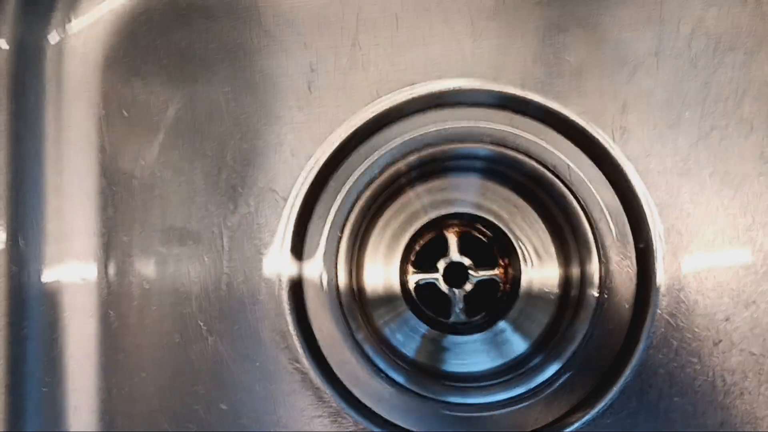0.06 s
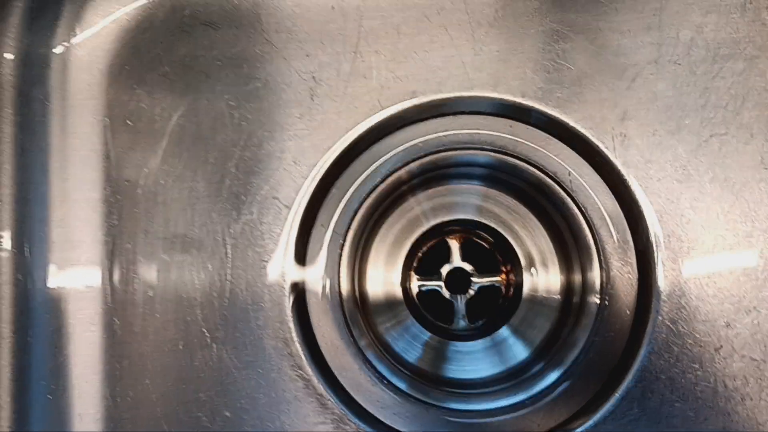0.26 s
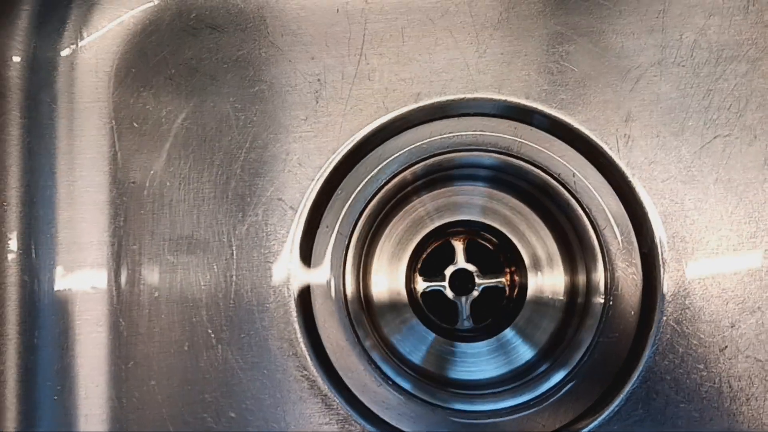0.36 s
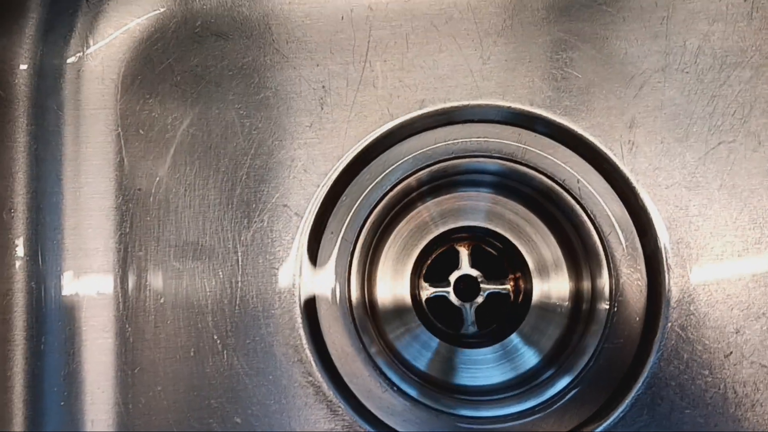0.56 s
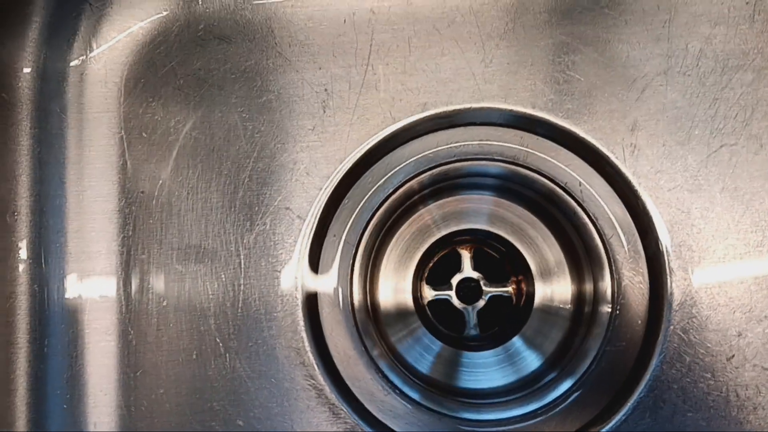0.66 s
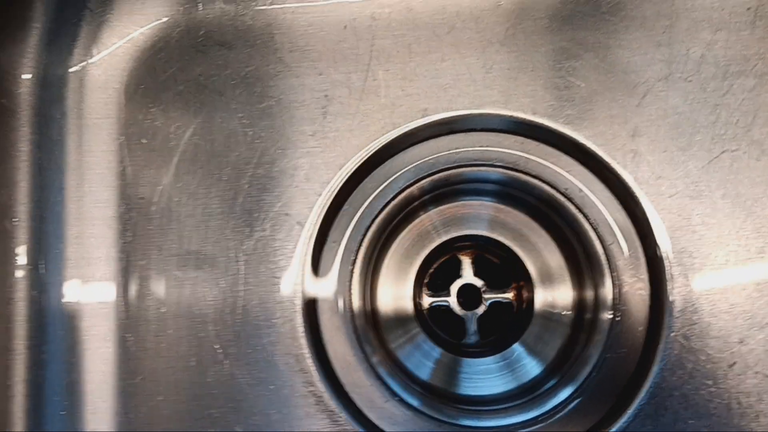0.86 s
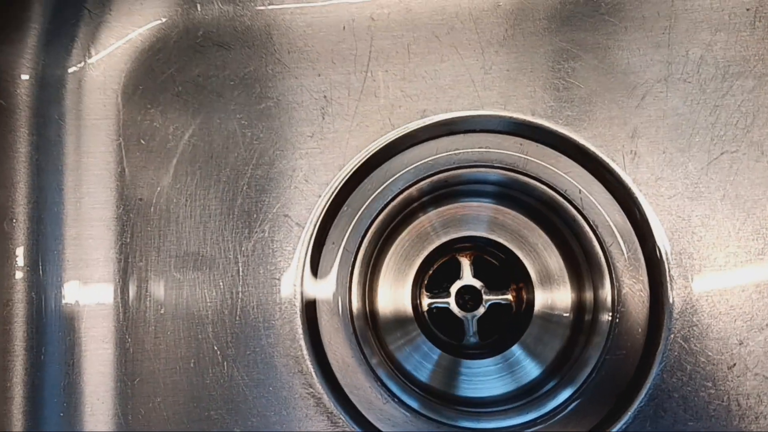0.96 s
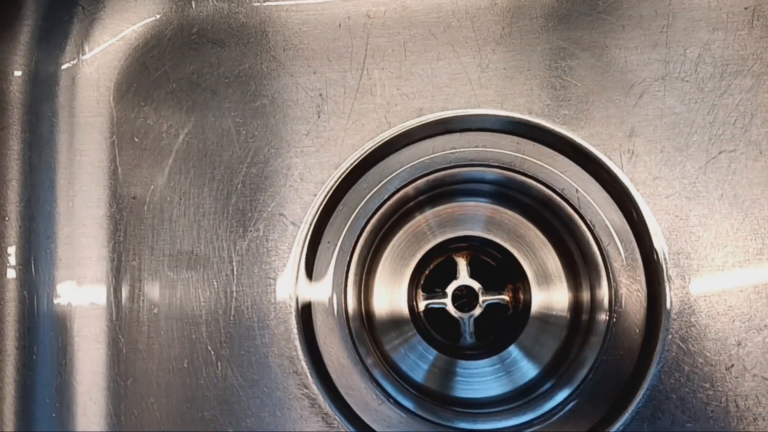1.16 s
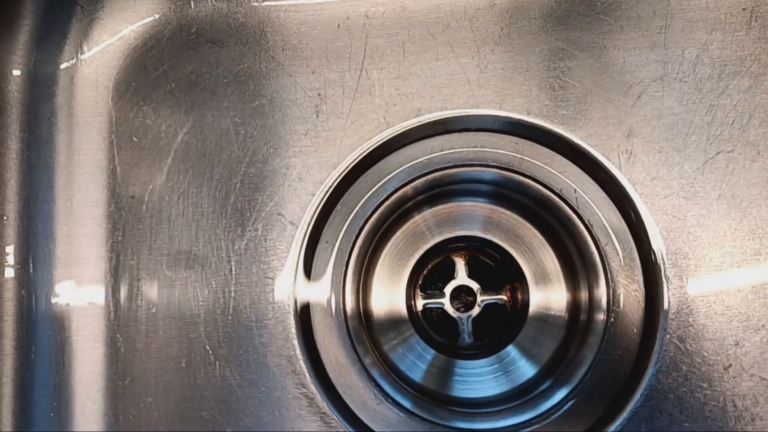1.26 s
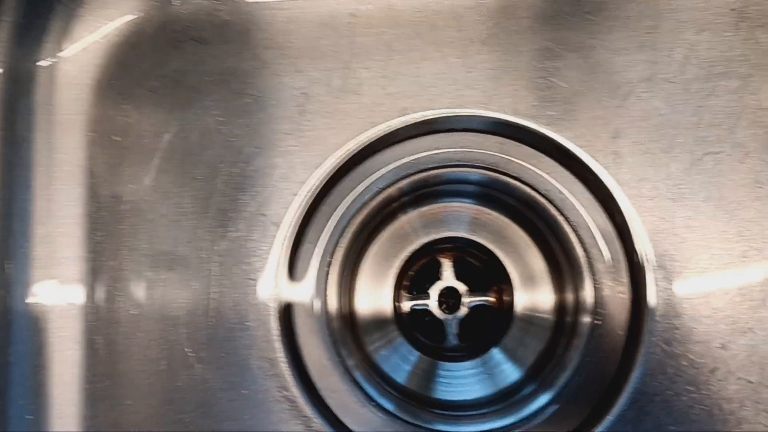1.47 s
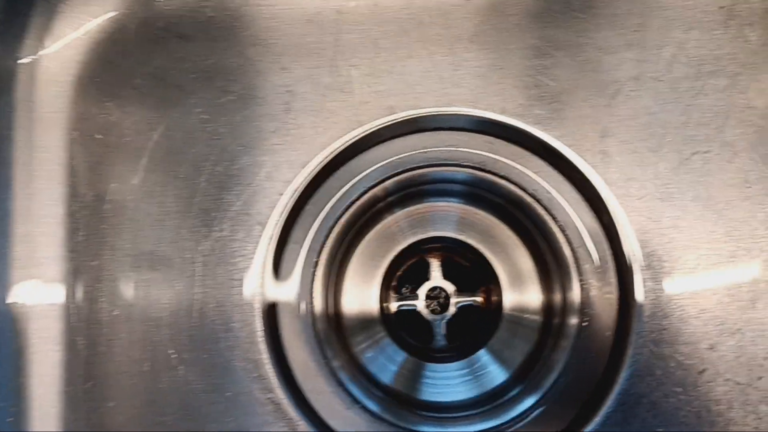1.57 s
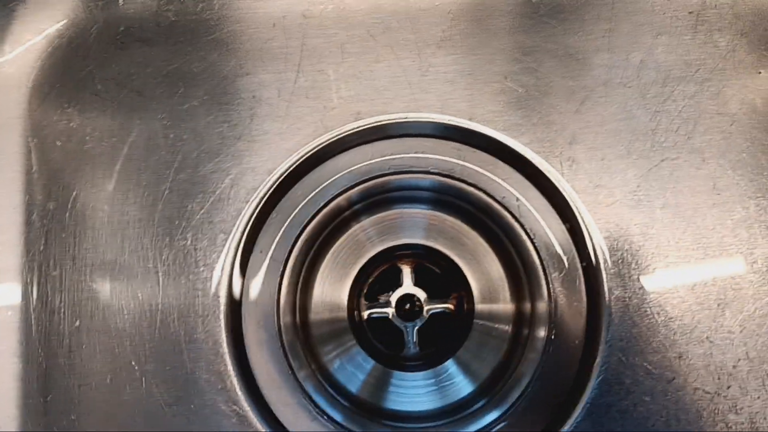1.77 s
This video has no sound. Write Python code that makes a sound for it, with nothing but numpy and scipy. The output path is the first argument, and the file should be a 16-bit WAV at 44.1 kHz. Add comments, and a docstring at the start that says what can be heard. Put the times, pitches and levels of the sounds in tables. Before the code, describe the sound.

Water gurgles down a steel sink drain, heard close up. Uneven bubbles start popping at about 0.2 seconds, ringing in the pipe with fine fizz and droplet ticks. The gurgling and sloshing are strongest from 0.6 to 1.2 seconds, with a brief hollow note around 1 second. After a smaller burst near 1.5 seconds, the bubbling fades by 1.8. A faint low hum and rumble fill the kitchen throughout.

```python
"""Water gurgles down the drain of a steel kitchen sink, heard from just above the basin.
Air bubbles break in the trap (the bend under the sink), each with a spray of smaller ones, over a fine
churn, fizz and slosh that swell and die away. The pipe rings with every bubble, droplets tick on the
steel and the air in the pipe briefly sings. A low hum and rumble fill the quiet kitchen."""
import sys
import numpy as np
from scipy import signal
from scipy.fft import rfft, irfft, next_fast_len
from scipy.io import wavfile
from scipy.ndimage import map_coordinates

SR = 44100
rng = np.random.default_rng(int(sys.argv[2]) if len(sys.argv) > 2 else 0)


def waveform_to_disk(signal):
    """Save audio, clipped to [-1, 1], as 16-bit WAV at the path in sys.argv[1]."""
    frames = np.transpose(np.atleast_2d(signal))
    scaled = np.clip(frames, -1, 1) * 32767
    samples = np.round(scaled).astype(np.int16)
    wavfile.write(sys.argv[1], SR, samples)


N = 79380
TIME = np.arange(N) / SR


def amp(db):
    """Turn decibels into a factor to multiply by."""
    return 10 ** (np.asarray(db) / 20)


def unit(x):
    """Scale a sound to an average power of 1."""
    return x / np.sqrt(np.mean(x ** 2) + 1e-20)


def along(points, hz):
    """Read a table of (frequency, value) at hz, spacing the frequencies by octaves."""
    f, value = np.transpose(points)
    return np.interp(np.log(hz + 1), np.log(f + 1), value)


def waver(steps):
    """A smooth random wobble; more steps make it faster."""
    return map_coordinates(rng.standard_normal(steps + 1), [np.linspace(0, steps, N)], mode="nearest")


def filtered(x, response):
    """Scale and delay each frequency f in a sound by response(f)."""
    size = 2 * next_fast_len(N)
    return irfft(rfft(x, size) * response(np.fft.rfftfreq(size, 1 / SR)), size)[..., :N]


def causal(db):
    """A filter response with these gains that never sounds ahead of its input (minimum phase)."""
    cepstrum = irfft(np.log(amp(db)))
    half = len(cepstrum) // 2
    cepstrum[1:half] *= 2
    cepstrum[half + 1:] = 0
    return np.exp(rfft(cepstrum))


def place(starts, waves):
    """Add up short sounds, each at its own start time."""
    at = (starts * SR).astype(int)[:, None] + np.arange(waves.shape[1])
    return np.bincount(at.ravel(), waves.ravel(), N)[:N]


def kitchen(hum_db=4, waver_db=.4, rumble_db=-42):
    """An appliance hums, wavering slightly, over a low rumble."""
    # tones of the hum: f/Hz, relative level/dB
    hum_tones = [(59.2, -45), (118.4, -51.5), (177.6, -47.5)]
    # tone colour of the rumble: f/Hz, relative level/dB
    rumble_colour = [(20, -11), (45, 0), (110, 4), (150, 1.5), (200, 2), (250, 3), (300, -36), (500, -20.5),
                     (1500, -25.5), (4500, -53.5), (9500, -63), (11500, -61)]
    hum = 0
    for hz, db in hum_tones:
        peak = np.sqrt(2) * amp(db + hum_db + waver_db * waver(14))
        hum += peak * np.sin(2 * np.pi * (hz * TIME + rng.random()))
    rumble = filtered(rng.standard_normal(N), lambda f: amp(along(rumble_colour, f)))
    return hum + amp(rumble_db) * unit(rumble)


def tail(fade_s):
    """A blur of echoes: noise in which each frequency f falls by 60 dB in fade_s(f) seconds."""
    hz, t, spectrum = signal.stft(rng.standard_normal(SR // 3), SR, nperseg=128)
    fade = amp(-60 * t / fade_s(hz)[:, None])
    echoes = signal.istft(spectrum * fade, SR, nperseg=128)[1]
    return np.pad(echoes / np.linalg.norm(echoes), (90, 0))  # arrives about 2 ms late


def scatter(x, fade_s, count=12):
    """Echoes change as the water surface moves: one random pattern blends into the next."""
    position = np.linspace(0, count - 1, N)
    shares = (np.maximum(1 - abs(position - k), 0) ** .5 for k in range(count))
    return sum(signal.fftconvolve(x * share, tail(fade_s))[:N] for share in shares)


def reflections(x, basin_fade_s=0.063, room_db=-15):
    """Sound bounces quickly between the basin walls and lingers longer in the kitchen."""
    # strength of the bounces, as steel mirrors treble best: f/Hz, gain/dB
    basin_colour = [(1500, -10), (6000, 0)]
    # time the kitchen's echo takes to fall by 60 dB: f/Hz, time/s
    room_fade = [(200, 0.33), (2000, 0.34), (10000, 0.031)]
    bounces = scatter(x, lambda f: np.full_like(f, basin_fade_s))
    basin = filtered(bounces, lambda f: amp(along(basin_colour, f)))
    room = scatter(x, lambda f: along(room_fade, f))
    return basin + amp(room_db) * room


def left_and_right(f, left_lag_s=0.0009937):
    """Sound reaches the left side later and has a different tone colour on the right."""
    # how much louder the left is than the right: f/Hz, level/dB
    balance = [(400, 5), (650, 3), (920, 8.5), (1400, 15.5), (1750, 8.5), (2200, 0.5), (3100, 5.5),
               (4900, -14.5), (6000, -12.5), (7600, -0.5), (9500, -13.5), (12000, -10)]
    half_lag = np.pi * f * left_lag_s
    return np.array([np.exp(-1j * half_lag), np.exp(1j * half_lag) * causal(-along(balance, f))])


def drain(f, steel_width_hz=42, echo_s=0.013, echo_db=-12.5):
    """Pipe and steel ring, the pipe's far end sends back an echo, and the drain mouth colours it all."""
    # notes of the pipe and basin (narrow ones ring longer): f/Hz, width/Hz, gain over direct sound/dB
    pipe_notes = [(248, 13.2, 9.5), (454.4, 6.8, 10.5), (654, 11, 7.5), (692, 10.2, 14.5),
                  (736.4, 19.2, 12.5), (910.5, 14.1, 25), (1111.6, 44, 8), (1287.4, 21.8, 10.5),
                  (1379.7, 19.3, 6), (1598, 26, 5.5), (1733, 72, 9)]
    # thin notes of the steel strainer and basin: f/Hz, gain over direct sound/dB
    steel_notes = [(2670, -19), (2850, 11.5), (3080, 15.5), (3340, 17.5), (3730, 15), (4720, 16.5),
                   (4810, 3), (5340, 17.5), (6030, 10.5), (6520, 9.5), (7520, 24), (8000, 9), (8760, 10),
                   (9450, 11.5), (9900, 6)]
    # tone colour of the drain mouth: f/Hz, gain/dB
    mouth = [(60, -19), (200, 0), (450, -2), (520, -8.5), (620, 0.5), (730, 1.5), (840, -5), (950, -11),
             (1380, 3), (1520, -4.5), (1790, -0.5), (1890, -14.5), (2000, -1.5), (2300, -1), (3100, -3.5),
             (4000, -8), (5300, -29), (8000, -19), (11500, -34.5)]
    notes = list(pipe_notes) + [(hz, steel_width_hz, db) for hz, db in steel_notes]
    ring = sum(amp(db) * 1j * f * width / (hz * hz - f * f + 1j * f * width) for hz, width, db in notes)
    echo = amp(echo_db) * np.exp(-2j * np.pi * f * echo_s)
    return (1 + ring + echo) * causal(along(mouth, f))


def air_column(hz=248, db=-26, start_s=0.898, rise_s=0.11):
    """The air above the trap sings a hollow, unsteady note while the flow is strongest."""
    age = np.maximum(TIME - start_s, 0) / rise_s
    swell = (age * np.exp(1 - age)) ** 2
    wobble = waver(30)
    return amp(db + 2 * wobble) * swell * np.sin(2 * np.pi * hz * TIME + .5 * wobble)


def pings(starts, hz, gain, ring_cycles, attack_cycles=.6, attack_s=.0004, rise_per_s=2.9):
    """Short tones that fade 20 dB per ring length and climb in pitch, as a surfacing bubble does."""
    t = np.arange(1500) / SR
    cycles = hz[:, None] * t
    onset = (1 - np.exp(-cycles / (attack_cycles + attack_s * hz[:, None]))) ** 2
    shape = onset * 10 ** (-cycles / ring_cycles[:, None])
    shape /= shape.max(1, keepdims=True)
    tone = np.sin(2 * np.pi * cycles * (1 + rise_per_s * t / 2))
    return place(starts, gain[:, None] * shape * tone)


def droplets(ring_cycles=12):
    """Droplets hit the steel with brief, high ticks."""
    # one row per droplet: t/s, f/Hz, relative level/dB
    hits = [(.252,9700,-27),(0.375,4770,-31.5),(.606,5140,-20.5),(.649,5910,-21.5),(0.687,8270,-25),(.720,6400,-16.5),(.808,10000,-36),(0.984,4420,-15.5),(1.014,5560,-20),(1.118,8450,-24),(1.1997,4620,-26),(1.2,8000,-20)]
    starts, hz, db = np.transpose(hits)
    return pings(starts, hz, amp(db), np.full(len(starts), ring_cycles))


def swarm(loudness, centre_hz, octaves, ring_cycles, spread_db, count):
    """Many bubbles of random size ring together, following a table of loudness over time."""
    jitter, strength, length = rng.random((count, 3)).T
    starts = (np.arange(count) + 2 * jitter) / count * N / SR
    hz = np.minimum(centre_hz * 2 ** (octaves * rng.standard_normal(count)), SR / 3)
    cloud = pings(starts, hz, amp(spread_db * strength ** 2), ring_cycles * (.5 + length))
    return unit(cloud) * amp(np.interp(TIME, *np.transpose(loudness)))


def churn(bass_cut_hz=830):
    """Small bubbles churn in the drain, too small to carry any bass."""
    # loudness of the churn: t/s, relative level/dB
    loudness = [(0, -46), (.17, -53.5), (.24, -35), (.33, -37), (.45, -46.5), (.52, -34.5), (.66, -31),
                (1.08, -27), (1.31, -43), (1.44, -44), (1.51, -39.5), (1.57, -46), (1.8, -60)]
    cloud = swarm(loudness, centre_hz=1411.5, octaves=0.521, ring_cycles=4.57, spread_db=11, count=1200)
    return filtered(cloud, lambda f: 1 - 1 / (1 + (f / bass_cut_hz) ** 10))


def fizz():
    """Foam bursts in tiny, very high pings."""
    # loudness of the foam: t/s, relative level/dB
    loudness = [(.17, -61), (.32, -47.5), (.47, -63), (.6, -46.5), (.71, -43), (.88, -52.5), (1.05, -43.5),
                (1.35, -60), (1.8, -74.5)]
    return swarm(loudness, centre_hz=6996, octaves=0.3996, ring_cycles=22, spread_db=16, count=2200)


def slosh():
    """Water sloshes in the trap with low, bubbling notes."""
    # loudness of the slosh: t/s, relative level/dB
    loudness = [(.17, -64), (.27, -46), (.62, -55), (.7, -35.5), (1.1, -33.5), (1.24, -41.5), (1.36, -85.5),
                (1.5, -45), (1.62, -68)]
    return swarm(loudness, centre_hz=450.3, octaves=0.713, ring_cycles=5.5, spread_db=-14.5, count=400)


def snaps(starts, hz, gain, ring_cycles, fade_s=0.006, dull_hz=2000, splashy_cycles=3.7):
    """A bubble's skin tears with a puff of noise, louder for small bubbles and short rings."""
    t = np.arange(700) / SR
    shape = np.exp(-t / fade_s) * (1 - np.exp(-2 * t / fade_s))
    puffs = rng.standard_normal((len(starts), len(t))) * shape
    strength = gain * hz / dull_hz * np.minimum(splashy_cycles / ring_cycles, 1)
    tearing = place(starts, strength[:, None] * puffs)
    return filtered(tearing, lambda f: 1 / (1 + 1j * f / dull_hz) / (1 + .5j * f / dull_hz))


def glugs(snap_db=-27, spray_count=4, spray_db=-16.5, spray_delay_s=0.011, spray_octaves=0.53):
    """Each large air bubble rings, snaps open and sheds a spray of smaller, higher ones."""
    # one row per large bubble: t/s, f/Hz, relative level/dB, ring length/cycles
    bubbles = [(0.014,1960,-25.5,9.7),(.196,1094,-27,9),(0.203,254,-24.5,4.2),(0.234,1400,-20,10.5),(.243,1170,-10.5,2.3),(0.246,398,-8,2.3),(.251,678,-11,2),(0.309,1350,-6.5,0.86),(0.375,2430,-14.5,7.2),(0.382,630,-18.5,1.54),(0.38,1426,-15.5,3),(0.413,1425,-25,1.4),(.476,1380,-17.5,2.6),(0.505,1364,-18,1.7),(.521,1245,-15.5,5.5),(.542,2110,-11.5,2.7),(0.543,3130,-19.5,7.1),(0.601,2970,-22.5,3.5),(.617,1380,-6.5,2.94),(.654,924,-18,3.6),(0.687,391,-14.5,3.4),(0.697,1480,-12.5,3.1),(.729,919,-20.5,9.1),(0.793,1260,-11,1.8),(0.804,917,-19.5,15),(.851,1580,-17.5,2),(.857,803,-13,2.4),(0.866,957,-17,11),(0.871,3350,-24.5,10),(0.871,1549,-15.5,26),(.942,858,-13,2),(1.011,2765,-16,5.4),(1.014,1350,-15.5,12.6),(1.022,1410,-17.5,19),(1.101,2680,-12.5,4.8),(1.101,1410,-7,5.1),(1.115,1440,-11.5,14),(1.166,3460,-18.5,2.1),(1.171,1635,-20.5,4.7),(1.264,2920,-27.5,14),(1.281,1760,-16.5,1.12),(1.374,1500,-20.5,2.3),(1.402,1234,-26,2.7),(1.462,2640,-24.5,2.8),(1.462,917,-32,3.5),(1.48,1130,-19.5,1.9),(1.497,1510,-21,9.4),(1.653,1820,-40.5,12),(1.726,2320,-29.5,16)]
    starts, hz, db, ring_cycles = np.transpose(bubbles)
    sound = pings(starts, hz, amp(db), ring_cycles)
    sound += snaps(starts, hz, amp(db + snap_db), ring_cycles)
    for _ in range(spray_count):
        delay = rng.exponential(spray_delay_s, len(starts))
        octaves_up = spray_octaves * np.abs(rng.standard_normal(len(starts)))
        spray_hz = np.minimum(hz * 2 ** octaves_up, SR / 3)
        sound += pings(starts + delay, spray_hz, amp(db + spray_db), ring_cycles)
    return sound


def scene():
    """The water sounds through drain, basin and kitchen, joined by the singing air and the background."""
    water = churn() + fizz() + slosh() + glugs() + droplets()
    gurgle = filtered(water, drain)
    sides = np.array([gurgle + reflections(gurgle) for _ in range(2)])
    return filtered(sides + air_column() + kitchen(), left_and_right)


def record(dry, top_hz=15700):
    """Cut away the very highest treble."""
    return filtered(dry, lambda f: f < top_hz)


dry = scene()
out = record(dry)
waveform_to_disk(out)
```